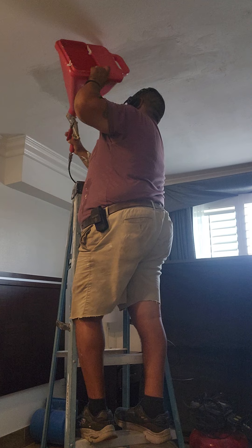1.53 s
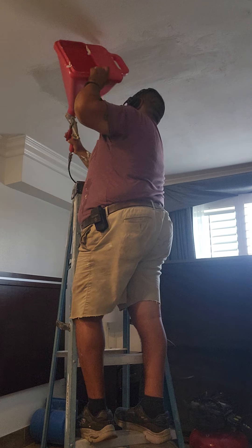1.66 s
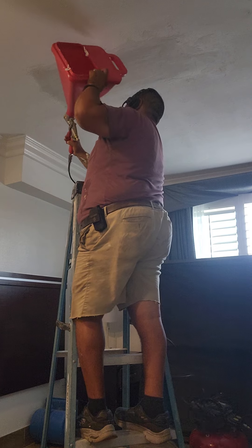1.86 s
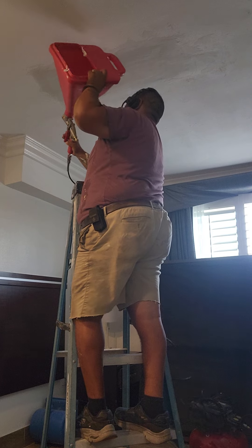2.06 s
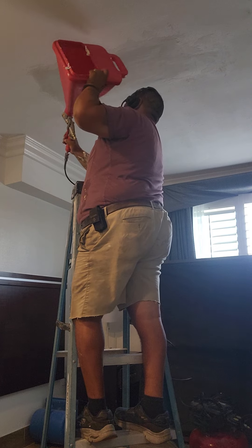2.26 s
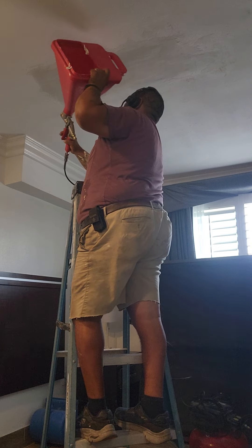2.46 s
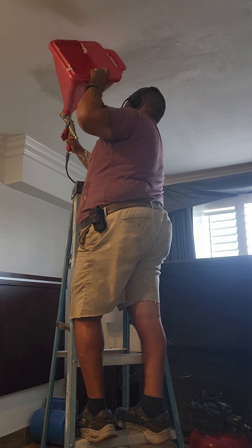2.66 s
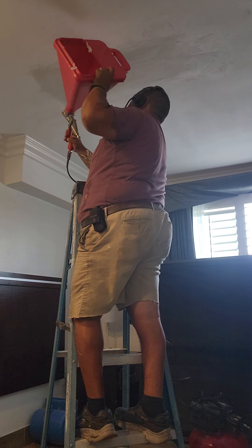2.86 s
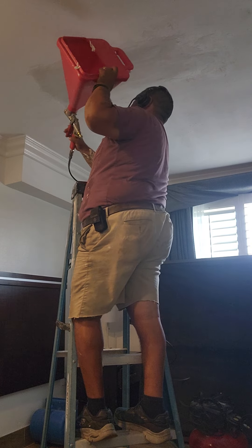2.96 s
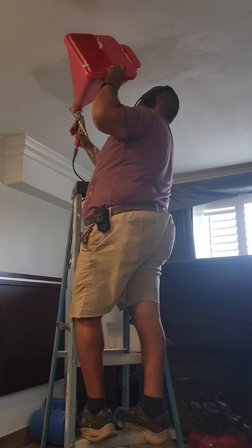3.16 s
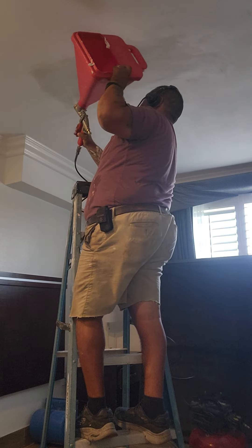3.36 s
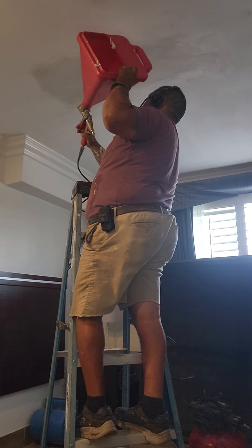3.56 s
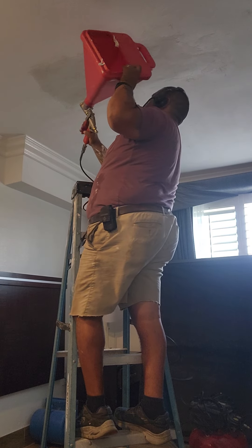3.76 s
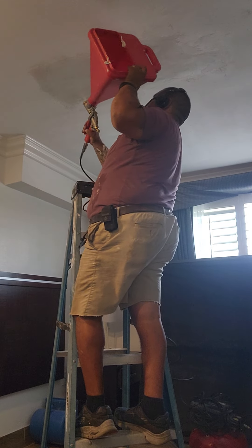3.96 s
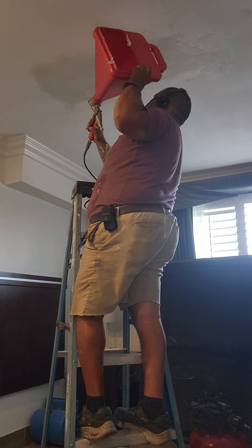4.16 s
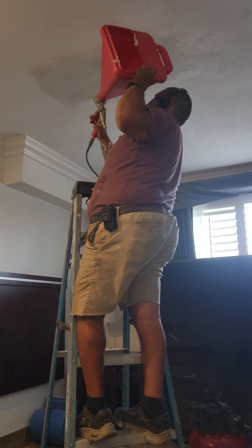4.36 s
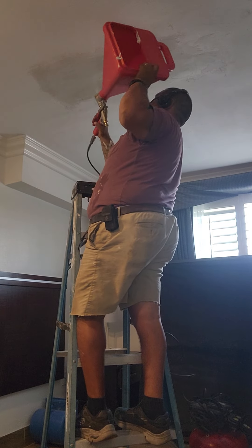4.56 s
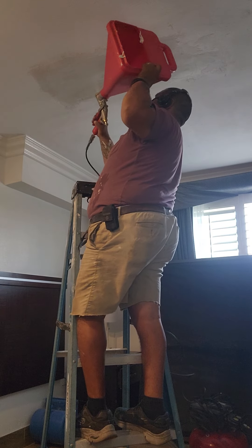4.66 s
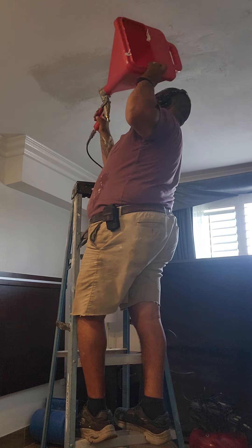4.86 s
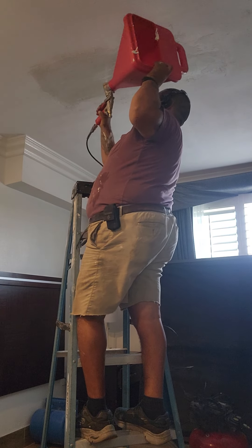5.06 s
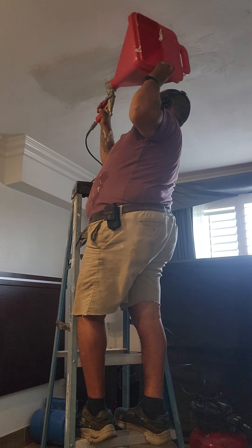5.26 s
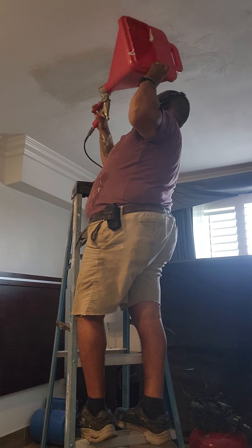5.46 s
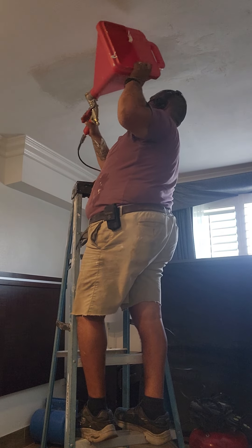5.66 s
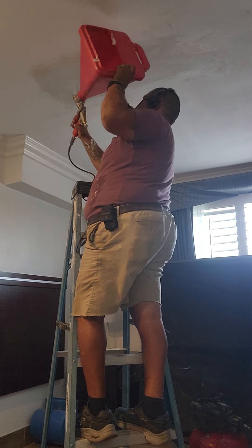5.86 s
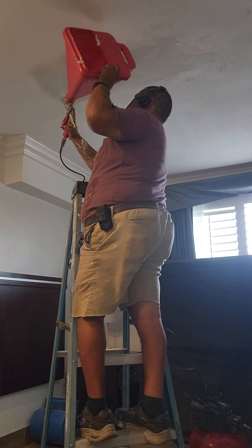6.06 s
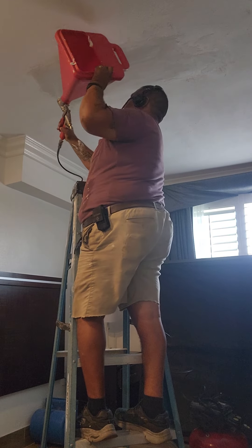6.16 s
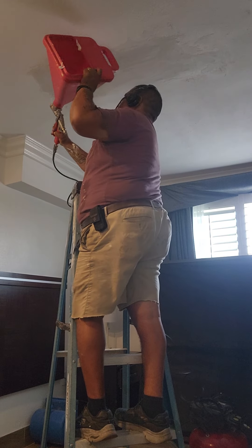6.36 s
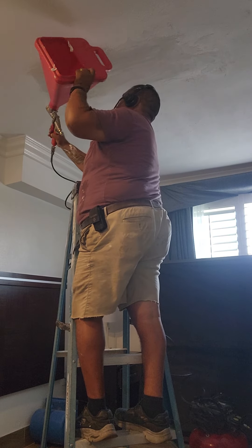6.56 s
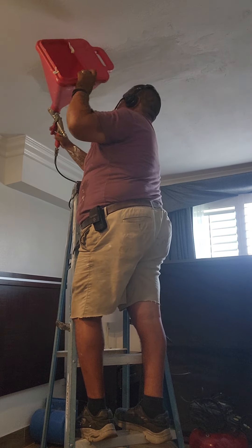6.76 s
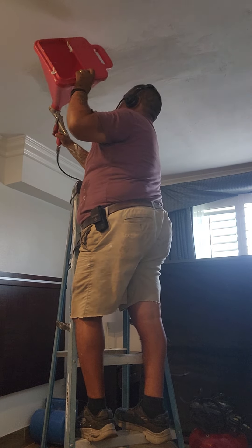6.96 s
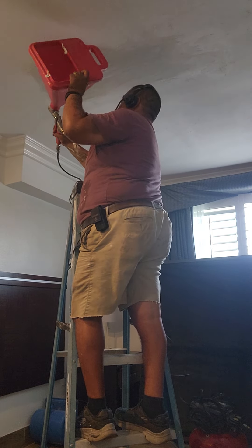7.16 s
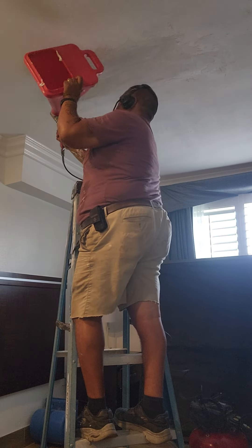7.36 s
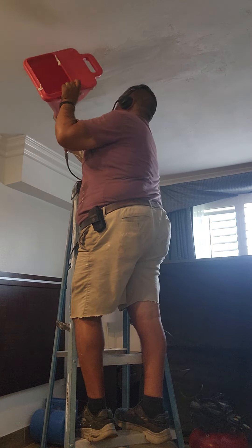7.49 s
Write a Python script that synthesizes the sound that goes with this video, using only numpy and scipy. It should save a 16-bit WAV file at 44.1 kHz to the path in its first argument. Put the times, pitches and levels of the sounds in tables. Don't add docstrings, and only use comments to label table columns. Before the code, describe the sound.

Bright pressurised hissing starts and stops abruptly as a trigger is pulled. Early spurts are mostly dry air, each opening with a small pop and puff; later ones grow longer, rougher and wetter as plaster loads the stream, and a hollow whistle comes and goes. Between pulls, a quiet leak hiss and a low, throbbing compressor hum remain. Indoor space, short reverberation, handheld stereo pickup with soft low bumps.

```python
import sys
import numpy as np
from scipy import signal
from scipy.fft import rfft, irfft, next_fast_len
from scipy.io import wavfile
from scipy.ndimage import uniform_filter1d, map_coordinates

SR = 44100
rng = np.random.default_rng(int(sys.argv[2]) if len(sys.argv) > 2 else 0)


def nominal_scale(level):
    x = np.asarray(level, float) / 20
    return 10 ** x


def unload_audio(sound):
    columns = np.transpose(np.atleast_2d(sound))
    steps = np.round(np.clip(columns, -1, 1) * 32767)
    wavfile.write(sys.argv[1], SR, steps.astype(np.int16))


N = 362943

# (time [s], level of the air layers [dB])
AIM = [(3.35, 1.5), (3.6, -.5), (3.95, 1), (4.2, 0), (4.32, 0), (4.7, 0.4), (5.05, -0.3), (5.22, 0.3),
       (5.4, 0), (6.0, 0.5), (6.25, -1), (6.55, 0), (7.13, 0.9), (7.3, -0.1), (7.4, 2), (7.51, 0.5),
       (7.75, 0.5), (8.2, -.3)]


def gun():
    slugs = wobble(35) + 0.44 * wobble(120)
    air = air_jet(slugs) + lip_fizz(slugs) + eddy_roar(slugs)
    return nominal_scale(curve(AIM)) * air + valve_leak() + mud_spatter(slugs) + barrel_hoot(slugs)


# (frequency [Hz], density [dB per Hz])
JET_SPECTRUM = [(1710, -33), (2900, -13.5), (3170, -12), (3550, -9.5), (4170, -5), (4520, -5.5), (4890, 1),
                (6070, 0.5), (6890, -4), (7460, -3), (8350, -15.5), (9400, -65), (12200, -55),
                (20700, -120)]


def air_jet(slugs):
    noise = diffuse(shape(JET_SPECTRUM), patchy_db=1.0, room=0.9)
    return nominal_scale(-1.24 + 0.58 * slugs) * trigger("jet", lag=1.4, t60=0.49, wet=0.2) * noise


# (frequency [Hz], density [dB per Hz])
FIZZ_SPECTRUM = [(7000, -23), (8800, -7.5), (9470, -12.5), (10200, -4.5), (10900, -1.5), (11400, 5.5),
                 (13000, 3.5), (14500, 3.5), (15900, 0.2)]


def lip_fizz(slugs):
    noise = diffuse(shape(FIZZ_SPECTRUM), patchy_db=1.5, room=0.51)
    return nominal_scale(1.3 + 0.4 * slugs) * trigger("fizz", lag=1.22, t60=0.43, wet=0.22) * noise


# (frequency [Hz], density [dB per Hz])
ROAR_SPECTRUM = [(880, -18.5), (1500, -12.5), (1640, -9.5), (2100, -2), (2580, -5.5), (3200, -1.5),
                 (3340, -3), (3480, -2.5), (4000, -1), (5200, -6), (8800, -120)]


def eddy_roar(slugs):
    noise = diffuse(shape(ROAR_SPECTRUM), patchy_db=1.2, room=0.87)
    return nominal_scale(0.73 + 1.05 * slugs) * trigger("roar", lag=0.99, t60=0.37, wet=0.5) * noise


# (frequency [Hz], density [dB per Hz])
MUD_SPECTRUM = [(53, -37), (90, -7), (210, -5.5), (272, 0.5), (375, -3.5), (408, -3), (479, -3.5),
                (522, -4.5), (660, 0), (1010, -2), (1200, -5), (1700, -6.5), (2210, -18), (3740, -120)]


def mud_spatter(slugs):
    noise = diffuse(shape(MUD_SPECTRUM), patchy_db=1.5, room=0.88)
    return nominal_scale(0.6 + 0.57 * slugs) * trigger("mud", lag=1, t60=0.24, wet=0.84) * noise


def barrel_hoot(slugs):
    level_db = -1.0 + 0.59 * slugs + 2.0 * wobble(7.5)
    return nominal_scale(level_db) * trigger("hoot", lag=1, t60=0.19, wet=0.48) * air_column(alike=0.88)


# (multiple of pitch, width [Hz], level [dB])
BARREL_MODES = [(1.001, 85.85, 1.5), (1.92, 39.3, -8), (2.9, 131, -3.5)]
# (time [s], pitch [Hz], level above mud [dB])
HOOT_PITCH_LEVEL = [(1.4, 803.5, -8), (2.34, 805, 7.5), (2.43, 803, -5), (3.0, 802, -4), (3.55, 790, -7),
                    (3.93, 738, 7.5), (4.14, 745, 2), (4.22, 795, 3.5), (4.4, 794, -10), (4.7, 790, -15),
                    (4.97, 755, 6), (5.1, 770, -21), (5.4, 797, 1), (6.04, 795, 6.5), (6.2, 800, -8),
                    (7.6, 801, 0), (7.78, 801, -22), (8.2, 801, -10)]


def air_column(alike):
    rows = np.array(HOOT_PITCH_LEVEL)
    phase = 2 * np.pi * np.cumsum(curve(rows[:, :2])) / SR
    ears = np.zeros((2, N))
    for multiple, width_hz, db in BARREL_MODES:
        both, left, right = (narrow(multiple * phase, width_hz) for _ in range(3))
        ears += nominal_scale(db) * (alike * both + np.array([left, right]))
    return unit(ears) * nominal_scale([[-2.8], [2.8]]) * nominal_scale(curve(rows[:, ::2]))


# (frequency [Hz], density [dB per Hz])
LEAK_SPECTRUM = [(1470, -8), (2500, -8), (2820, -13), (3070, -9), (3580, -8), (3890, -6), (4500, -7.5),
                 (5320, -5), (9580, -22), (11400, -9.5), (15500, -20)]
# (time [s], level [dB])
LEAK_LEVEL = [(0.3, -46.5), (1.7, -46.5), (2.7, -45), (3.8, -46.5), (4.55, -49), (5.7, -48), (6.95, -44)]


def valve_leak():
    return nominal_scale(curve(LEAK_LEVEL)) * diffuse(shape(LEAK_SPECTRUM), patchy_db=-2.0, room=0.49)


# (fully open [s], shuts [s], air pressure [dB], opening time [s], first puff [dB])
PULLS = [(-0.1, 0.044, -27, .02, 2), (0.377, 0.527, -23, 0.019, 2.5), (1.243, 1.45, -23.5, .02, 1.5),
         (1.803, 2.025, -24, .017, 5.5), (2.254, 2.437, -21.5, 0.018, 2), (2.766, 3.052, -22.5, 0.015, 5),
         (3.294, 3.611, -21.5, 0.015, 3), (3.85, 4.404, -22.5, 0.014, 1.5),
         (4.593, 5.47, -21.5, 0.018, 2.5), (5.745, 6.748, -22.5, 0.014, 3.5), (6.987, 8.4, -21, 0.01, 2.5)]
DRIBBLE_S = {"jet": 0.0012, "fizz": .001, "roar": 0.0096, "mud": 0.0098, "hoot": 0.011}


def trigger(layer, lag, t60, wet):
    seat_db, settle_db, settle_s = 34, 4, 0.01
    close_s = 0.021
    power = np.zeros(N)
    for pull in PULLS:
        opens, shuts, _, rise, _ = pull
        rise = lag * rise
        span = slice(max(int((opens - rise) * SR), 0), int((shuts + .5) * SR))
        t = np.arange(N)[span] / SR
        lifting_db = seat_db * np.minimum(t - opens, 0) / rise
        settling_db = settle_db * np.exp(-np.maximum(t - opens, 0) / settle_s)
        level = nominal_scale(lifting_db - settling_db) * flow(layer, np.clip(t, opens, shuts), pull)
        late = np.clip(t - shuts + close_s - DRIBBLE_S[layer], 0, None)
        since = late ** 2 / (late + close_s)
        direct = abs(1 - wet) * nominal_scale(-120 * since / 0.19)
        power[span] += level ** 2 * (wet * nominal_scale(-120 * since / t60) + direct)
    return np.sqrt(power)


# (arrives [s], loaded jet [dB], mud above jet [dB], build-up [s])
FEEDS = [
    (1.37, -19, -20, 0.026),
    (2.31, -17, -10.5, 0.047),
    (2.861, -18, -11.5, 0.025),
    (3.34, -17.5, -14, 0.021),
    (3.904, -17.5, -11.5, 0.078),
    (4.64, -18, -12, 0.045),
    (5.835, -17.5, -13, 0.029),
    (7.05, -18, -12, 0.011),
]
LOADED_DB = {"jet": -0.02, "fizz": -6, "roar": 0.1, "mud": 0, "hoot": -3.4}


def flow(layer, t, pull):
    dry = dry_flow(layer, t, pull)
    for arrives, jet_db, mud_db, build_s in FEEDS:
        if pull[0] < arrives < pull[1]:
            since = np.clip(t - arrives, 0, None)
            thick_db = mud_db + growth_db(since, build_s)
            extra_db = {
                "jet": 0,
                "fizz": 2 * np.exp(-since / 0.061),
                "roar": -3 + 0.39 * np.maximum(thick_db, mud_db - 2.5),
                "mud": thick_db,
                "hoot": mud_db + growth_db(since, 0.038),
            }[layer]
            loaded = nominal_scale(jet_db + LOADED_DB[layer] + extra_db)
            mixed = 1 - np.exp(-since / 0.0065)
            return np.sqrt((1 - mixed) * dry ** 2 + mixed * loaded ** 2)
    return dry


def growth_db(since, build_s):
    return 20 * np.log10(1.001 - np.exp(-since / build_s))


DRY_DB = {"jet": 0.3, "fizz": -1.7, "roar": -15.5}
PUFF_SHARE = {"jet": 1, "fizz": 1.8, "roar": 1.9}


def dry_flow(layer, t, pull):
    opens, _, air_db, _, puff_db = pull
    if layer not in DRY_DB:
        return 0 * t
    level_db = air_db + DRY_DB[layer] + PUFF_SHARE[layer] * puff_db * np.exp((opens - t) / 0.056)
    if layer == "roar":
        level_db = level_db + 3.5 * np.exp((opens - t) / 0.018)
    return nominal_scale(level_db)


# (frequency [Hz], left-right correlation)
LIKENESS = [(60, 0.88), (130, 0.97), (290, 0.99), (640, 0.79), (1150, -0.12), (1750, -0.33), (2700, 0.03),
            (6820, -0.0089), (15000, 0.021)]
# (frequency [Hz], left minus right [dB])
LEAN = [(60, -0.5), (200, -2), (420, -3.5), (770, -7.5), (1300, -4), (2700, -3), (4200, -4), (5300, -6),
        (6500, -3), (7600, 6), (8700, 12.5), (9500, 10.5), (10600, 9.5), (12500, .6)]


def diffuse(gain, patchy_db, room):
    z = signal.stft(rng.standard_normal((3, N)), window="cosine", nperseg=2048)[2]
    walls = patches((2, 2) + z.shape[1:], bins=2, frames=16)
    share = np.clip(room, 0, 1)
    reflected = z[2] * (walls[0] + 1j * walls[1])
    z = np.sqrt(1 - share) * z[:2] + np.sqrt(share / 2) * reflected
    z = z * nominal_scale(patchy_db * patches(z.shape[1:], bins=24, frames=3))
    pair = signal.istft(z, window="cosine", nperseg=2048)[1][:, :N]
    m = next_fast_len(N + 8192)
    hz = np.fft.rfftfreq(m, 1 / SR)
    turn = np.arccos(np.clip(along(LIKENESS, hz), -1, 1)) / 2
    a, b = rfft(pair, m) * gain(hz) * [np.cos(turn), np.sin(turn)]
    lean = nominal_scale(along(LEAN, hz) * [[.5], [-.5]])
    ears = irfft(np.array([a + b, a - b]) * lean, m)[:, :N]
    return ears / np.std(ears.mean(axis=0))


def patches(shape, bins, frames):
    field = uniform_filter1d(rng.standard_normal(shape), bins, -2)
    return unit(uniform_filter1d(field, frames, -1))


def narrow(phase, width_hz):
    return wobble(width_hz) * np.cos(phase) + wobble(width_hz) * np.sin(phase)


def wobble(rate):
    knots = rng.standard_normal(int(N * rate / SR) + 4)
    return map_coordinates(knots, [np.arange(N) * rate / SR])


def shape(spectrum):
    return lambda hz: nominal_scale(along(spectrum, hz))


def resonances(modes):
    return lambda f: np.sqrt(sum((nominal_scale(db) / (1 + ((f - c) / w) ** 2)) ** 2 for c, w, db in modes))


def along(points, hz):
    f, v = np.transpose(points)
    return np.interp(np.log(hz + 1), np.log(f + 1), v)


def curve(rows):
    return np.interp(np.arange(N) / SR, *np.transpose(rows))


def unit(x):
    return x / np.sqrt(np.mean(x ** 2) + 1e-20)


# (frequency [Hz], density [dB per Hz])
DRONE_SPECTRUM = [(21, -45), (35, -26), (60, -8), (100, -8), (150, -5), (238, -10), (310, -9), (366, -10.5),
                  (800, -11), (890, -12.5), (1100, -13.5), (1280, -15), (1500, -15), (3000, -19.5)]
# (frequency [Hz], width [Hz], level [dB])
TANK_MODES = [(200.3, 9.5, -7), (232, 14, 0.5), (284.7, 18, -3), (684, 32, -14.5), (1084, 47, -12)]
# (frequency [Hz], level [dB rms])
HUM_LINES = [(120, -59.5), (237, -50)]


def compressor():
    t = np.arange(N) / SR
    muffled = lambda hz: shape(DRONE_SPECTRUM)(hz) / (1 + (hz / 3500) ** 6)
    sound = nominal_scale(-42) * diffuse(muffled, patchy_db=2.9, room=0.49)
    boom_db = -39.5 - 3.0 + 1.9 * wobble(8)
    sound += nominal_scale(boom_db) * diffuse(resonances(TANK_MODES), patchy_db=0.7, room=0.39)
    for hz, db in HUM_LINES:
        line = np.sin(2 * np.pi * hz * t + 0.87 * wobble(5))
        sound += nominal_scale(db - 0.5 + 1.3 * wobble(3.3)) * line
    shaft_db = np.maximum(-46 - 1 * t ** 2, -62)
    shaft = np.sin(2 * np.pi * 70.7 * t + .25 * wobble(1.95))
    return sound + nominal_scale(shaft_db + .4 * wobble(3.6)) * shaft


# (time [s], level [dB])
JOLTS = [
    (2.5, -56),
    (4.06, -60),
    (4.56, -53),
    (5.05, -38),
    (5.5, -44),
    (5.9, -46),
    (6.36, -48),
    (6.89, -54),
    (7.99, -45),
]


def sway():
    t = np.arange(N) / SR
    level = nominal_scale(-75 + 2.5 * wobble(6))
    for s, db in JOLTS:
        level += nominal_scale(db) * np.exp(-((t - s) / 0.06) ** 2)
    return level * unit(narrow(2 * np.pi * 35 * t, width_hz=29))


def scene():
    return gun() + compressor() + sway()


def top_cut(x):
    return signal.sosfilt(signal.butter(12, 16660, fs=SR, output="sos"), x)


# (frequency [Hz], width [Hz], level [dB])
PORT_MODES = [(2720, 180, -2), (3310, 120, 2), (3525, 130, -5), (4395, 55, 0), (5520, 95, 1.5),
              (6480, 77, 4), (6800, 150, 0.5), (10500, 150, 3)]


def record(dry):
    m = next_fast_len(N + 8192)
    hz = np.fft.rfftfreq(m, 1 / SR)
    ports_db = sum(db / (1 + ((hz - c) / w) ** 2) for c, w, db in PORT_MODES)
    no_subsonic = 1 / (1 + (22 / (hz + 1)) ** 4)
    heard = irfft(rfft(dry, m) * nominal_scale(ports_db) * no_subsonic, m)
    flat = heard / (1 + np.abs(heard / 1.05) ** 8) ** (1 / 8)
    mix = irfft(rfft(flat) * (hz < 15760), m)[:, :N]
    return top_cut(mix)


dry = scene()
out = record(dry)
unload_audio(out)
```